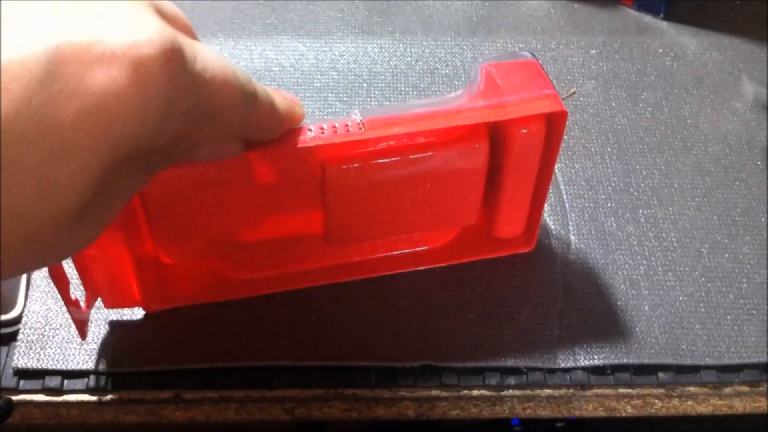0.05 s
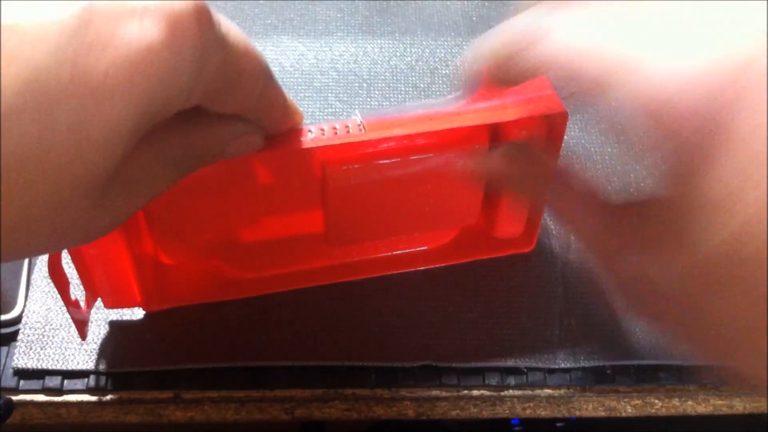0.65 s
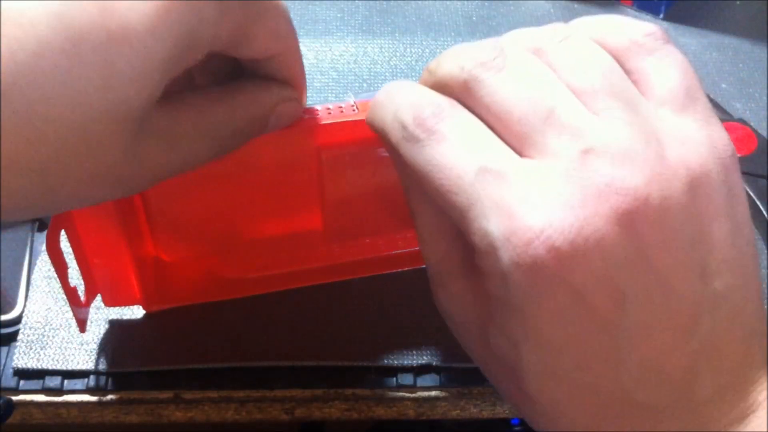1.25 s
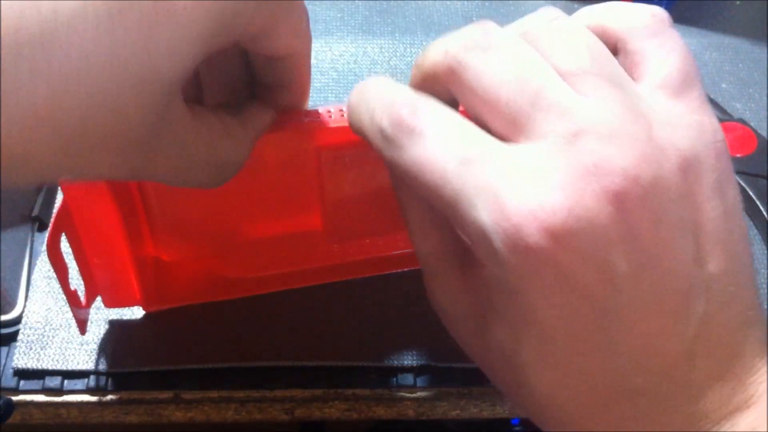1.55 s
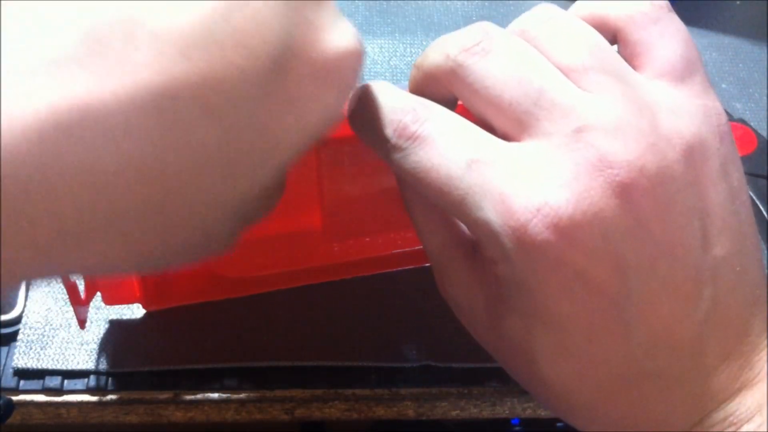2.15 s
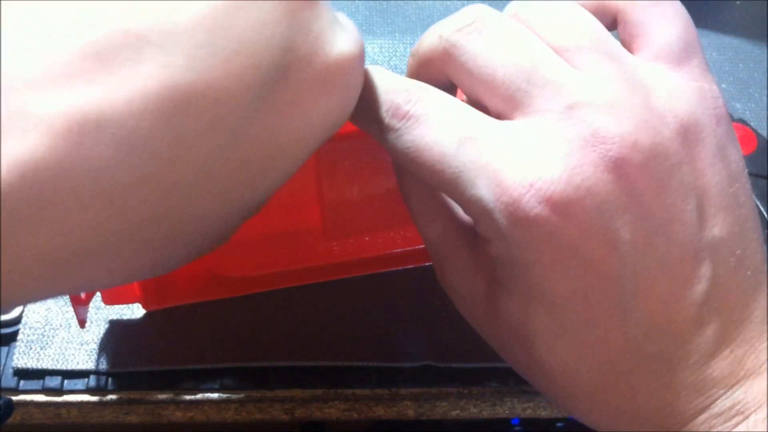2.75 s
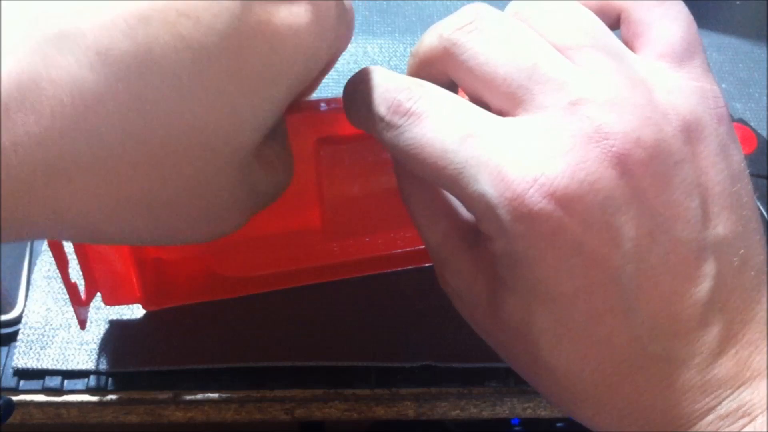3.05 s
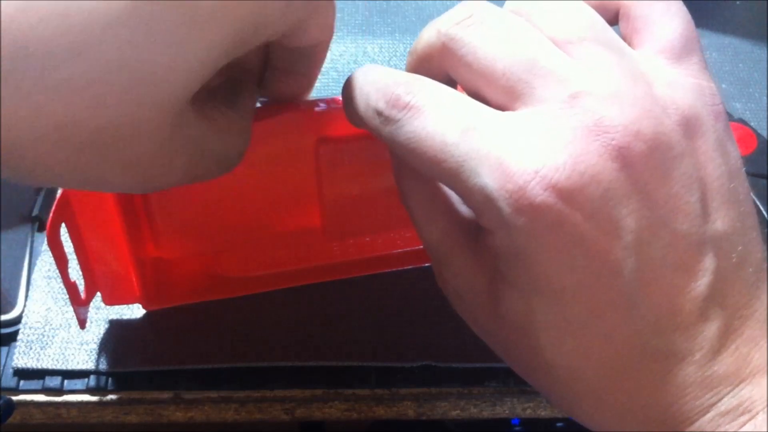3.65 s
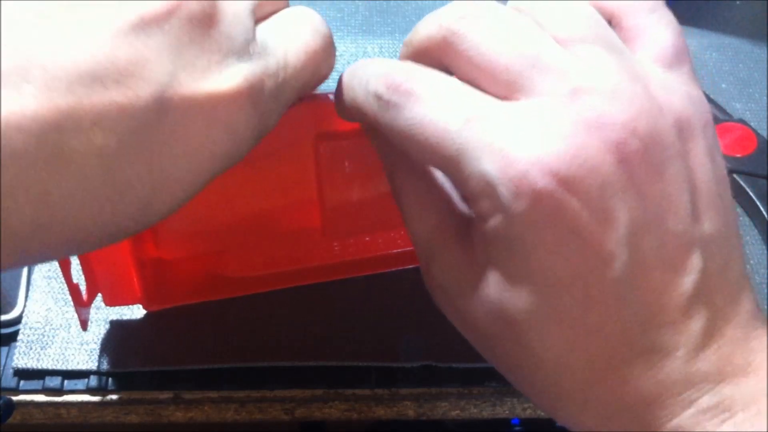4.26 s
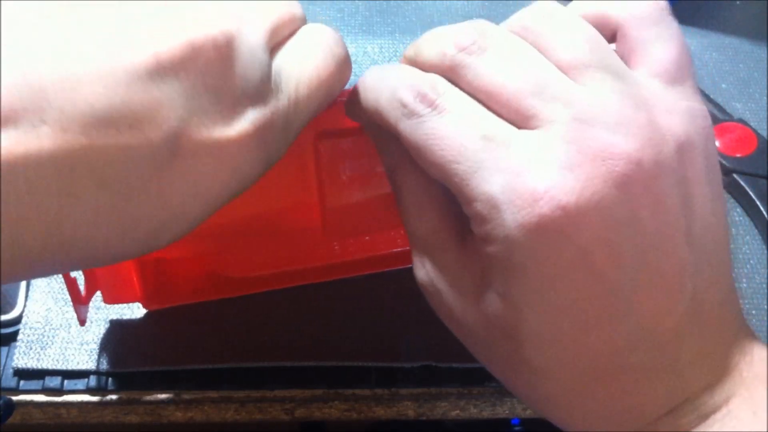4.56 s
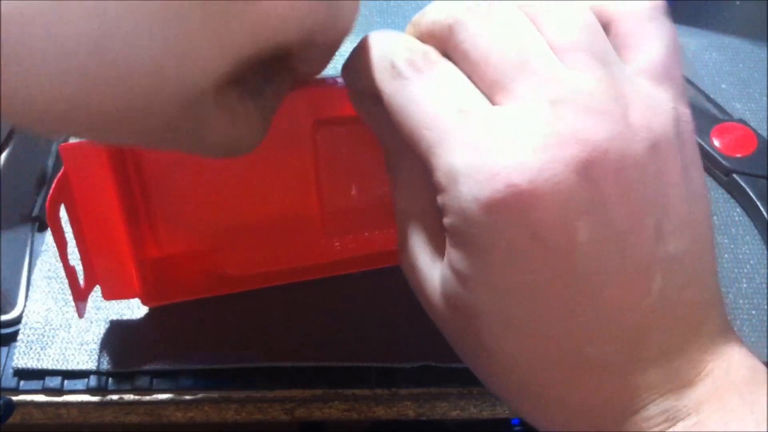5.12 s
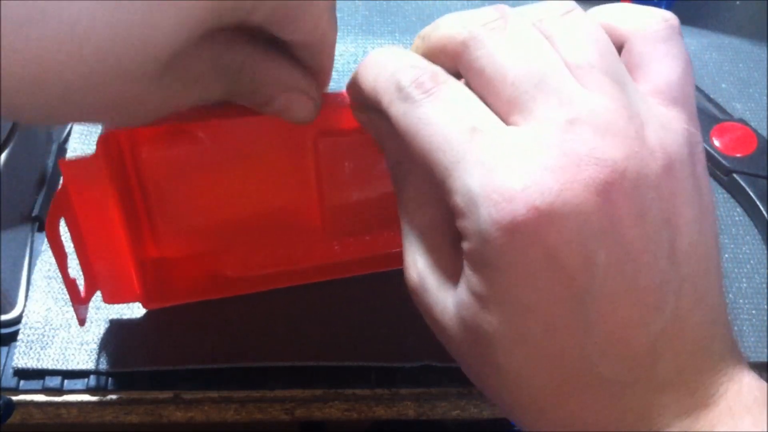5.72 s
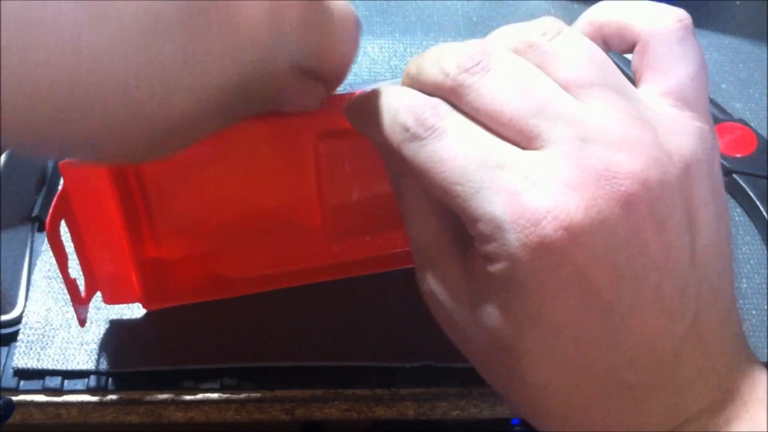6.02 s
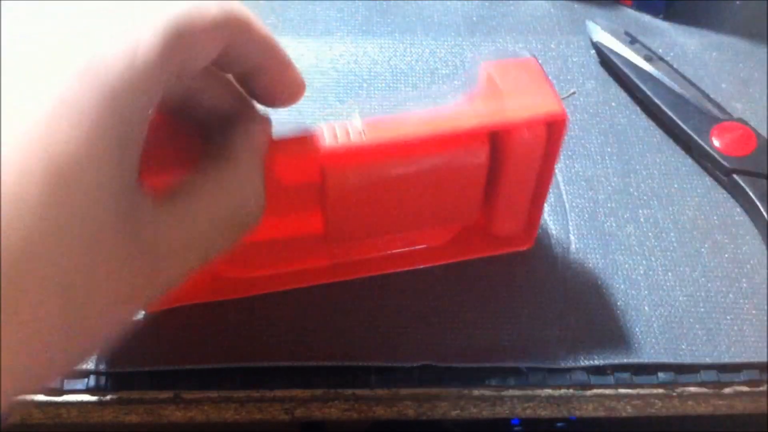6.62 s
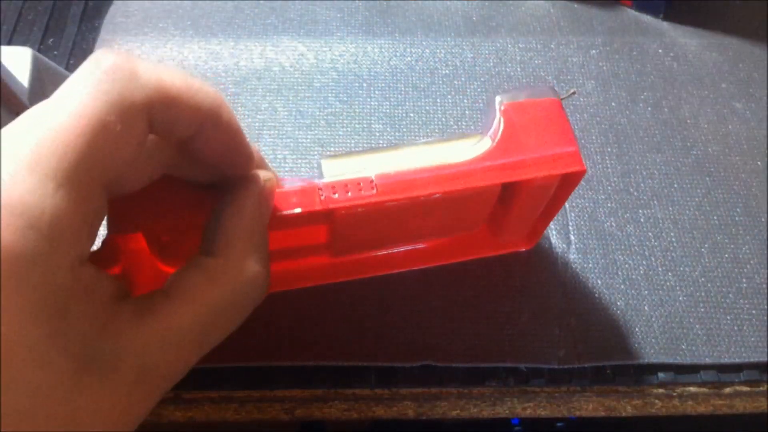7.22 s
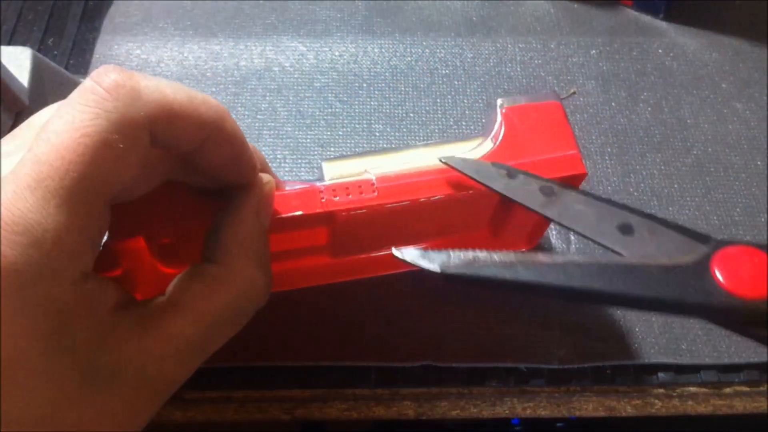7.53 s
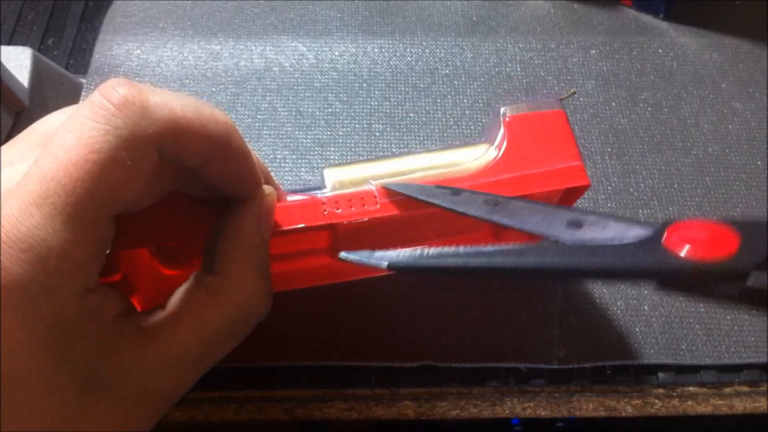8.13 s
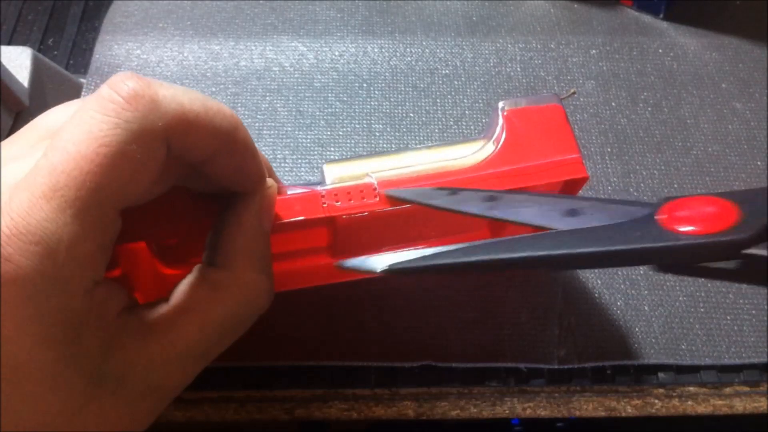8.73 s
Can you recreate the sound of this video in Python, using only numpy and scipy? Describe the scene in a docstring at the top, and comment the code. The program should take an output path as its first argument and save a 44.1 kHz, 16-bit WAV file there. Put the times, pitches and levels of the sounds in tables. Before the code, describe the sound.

In a small room, a fan rushes softly under a thin, very high whistle. Close by, fingers work at stiff plastic packaging on a desk: scattered clicks, a sharp snap, then a thickening run of hollow knocks, crackles and brief squeaks, and another loud snap. After a few nail scrapes, scissors open with a bright steel clink and their blades tick against the plastic several times.

```python
"""A fan and a thin whistle, likely from picture tubes, fill a small room as plastic starts to click.
Two hands pick and prise at a hard blister pack on a desk mat. Its shell buckles with clicks and
hollow knocks; its seam sticks and slips in squeaks and a creak, and gives way in two loud snaps.
Then scissors slide open, their steel blades clink, and they tap against the pack."""
import sys
import numpy as np
from scipy import signal
from scipy.fft import rfft, irfft, next_fast_len
from scipy.io import wavfile

SR = 44100
rng = np.random.default_rng(int(sys.argv[2]) if len(sys.argv) > 2 else 0)


def to_wav(s):
    """Save 16-bit WAV."""
    ch = np.atleast_2d(s).T  # columns
    pcm = np.round(np.clip(ch, -1, 1) * 32767)  # PCM
    wavfile.write(sys.argv[1], SR, pcm.astype(np.int16))


N = 396018
TIME = np.arange(N) / SR
RING = np.arange(SR // 4) / SR  # seconds since a blow


def undb(db):
    """Turn decibels (dB) into a number to multiply by."""
    return 10 ** (np.asarray(db) / 20)


def unit(x):
    """Scale a sound to an average (rms) strength of 1."""
    return x / np.sqrt(np.mean(x ** 2))


def strike(x, db):
    """Scale a blow so that its first 10 ms have this level."""
    return x * undb(db) / np.std(x[:SR // 100])


def add(out, s, x):
    """Mix x into out, starting at second s."""
    i = int(s * SR)
    out[i:i + len(x)] += x[:N - i]


def band(x, hz, kind, order=3):
    """Keep only the lows, the highs or a band between."""
    return signal.sosfilt(signal.butter(order, hz, kind, fs=SR, output="sos"), x)


def colour(x, points):
    """Turn each frequency up or down along a curve of (Hz, dB) points."""
    hz, db = np.transpose(points)
    size = next_fast_len(len(x))
    freqs = np.maximum(np.fft.rfftfreq(size, 1 / SR), 1)
    gain = undb(np.interp(np.log(freqs), np.log(hz), db))
    return irfft(rfft(x, size) * gain, size)[:len(x)]


def fade(t, t60):
    """Die away by 60 dB in t60 seconds, the fade time."""
    return np.exp(-np.log(1000) * t / t60)


def swells(rows):
    """A loudness curve with one bell-shaped rise and fall for each row."""
    return sum(undb(db) * np.exp(-.5 * ((TIME - s) / half) ** 2) for s, half, db in rows)


def walk(rate):
    """Drift at random by about 1, with a new target rate times a second."""
    targets = rng.standard_normal(int(N / SR * rate) + 2)
    return np.interp(TIME * rate, np.arange(len(targets)), targets)


def ring(notes, scatter_db, detune):
    """A struck thing rings with its own notes; spot and grip shift their strength and pitch."""
    hz, db, t60 = np.transpose(notes)[:, :, None]
    louder, higher, flip = rng.standard_normal((3, len(notes), 1))
    strength = np.sign(flip) * undb(db + scatter_db * louder) * fade(RING, t60)
    return np.sum(strength * np.sin(2 * np.pi * hz * (1 + detune * higher) * RING), axis=0)


def grains(rate, scatter_db):
    """Tiny slips of uneven size at random moments, about rate a second."""
    slips = (rng.random(N) < rate / SR) * rng.choice([-1, 1], N)
    return unit(slips * undb(scatter_db * rng.standard_normal(N)))


# The rush of the fan, with microphone hiss. Each row: frequency in Hz, boost or cut in dB.
AIR_COLOUR = [(25, -43), (85, -26), (161, -4.5), (247, -6.5), (368, -2), (480, -8.5), (520, -4.5),
              (840, -7), (1970, -14), (4300, -25.5), (11500, -29), (14500, -32.5)]
# The hum of the fan blades. Each row: pitch in Hz, level in dB.
FAN_TONES = [(817, -68), (875, -64)]
def fan(air_db=-53, waver=0.00374):
    """A fan makes a steady rush of air and two wavering blade tones."""
    air = unit(colour(rng.standard_normal(N), AIR_COLOUR)) * undb(air_db + .5 * walk(rate=3.3))
    tones = 0
    for hz, db in FAN_TONES:
        gain = undb(db + walk(rate=2.5))
        phase = 2 * np.pi * hz * np.cumsum(1 + waver * walk(rate=26)) / SR
        tones += gain * unit(np.sin(phase))
    return air + tones


# The whistle swells and fades as arms move through its standing waves.
# Each row: time in seconds, level in dB before lift_db is added.
WHISTLE_LEVELS = [(0.0, -48), (0.45, -58), (0.9, -48), (1.6, -57), (3.6, -48), (4.35, -60), (4.5, -52),
                  (5.1, -56), (5.4, -70), (6.3, -51), (7.35, -54), (8.25, -65), (8.98, -48)]
def whistle(line_hz=(15734.3, 15747.3), second_db=-5, lift_db=2):
    """Two very high tones, likely from picture tubes, lie so close that they throb."""
    s, db = np.transpose(WHISTLE_LEVELS)
    first, second = (np.sin(2 * np.pi * hz * TIME) for hz in line_hz)
    return unit(first + undb(second_db) * second) * undb(np.interp(TIME, s, db) + lift_db)


# The plastic shell's own notes. Each row: pitch in Hz, strength in dB, fade time in seconds.
SHELL_NOTES = [(280, -10.5, 0.0454), (382, -6.5, 0.0683), (531.1, -4.5, 0.06), (875, -9.5, 0.037),
               (950, 0, 0.025), (1151, 7, 0.02), (1410.7, 7.5, 0.03), (1626, 3.5, 0.022), (1927, 3, 0.021),
               (2240, -9, 0.037)]
# The tone of a cracking crease. Each row: frequency in Hz, boost or cut in dB.
CRACK_COLOUR = [(1500, 1), (2800, 2.5), (4000, -1), (5400, 3.5), (6900, 1), (9000, 1), (11500, 2.5),
                (15500, -7.5)]
def buckle(flex_db, panel_db, crack_db, length_s, crack_t60=0.01994, sizzle_db=-22, sizzle_t60=0.37):
    """The plastic bends, then jumps: its panels ring and a crease cracks."""
    hz, db = np.transpose(CRACK_COLOUR)
    db_per_octave = 0.93 * min(crack_db - panel_db, 0)  # a soft blow has a dull crack
    crease_db = 5 * rng.uniform(-1.2, 1, len(hz))  # no two creases sound alike
    curve = np.c_[hz, db + crease_db + db_per_octave * np.log2(hz / hz[0])]
    noise = colour(rng.standard_normal(len(RING)), curve)
    after = np.maximum(RING - length_s / 2, 0)
    swell = np.minimum(RING / (length_s / 2 + 1 / SR), 1)
    # the thin sheet's countless high notes sizzle on after the crack
    crack = noise * swell * (fade(after, crack_t60) + undb(sizzle_db) * fade(after, sizzle_t60))
    # the panel gives a little first, then jumps
    body = 0.57 * ring(SHELL_NOTES, scatter_db=0.5, detune=0.044) + undb(2) * crack
    jump = int(length_s / 2 * SR)
    body[jump:] += ring(SHELL_NOTES, scatter_db=3, detune=0.0282)[:len(RING) - jump]
    lows = strike(band(body, [150, 720], "band", order=2), flex_db)
    mids = strike(band(body, [760, 2250], "band"), panel_db - 0.5)
    highs = strike(band(crack, 2300, "high", order=2), crack_db)
    return lows + mids + highs


def click(panel_db, sharp_db, length_s):
    """One click of the shell: the sharper it is, the less the broad panels flex."""
    flex_db = panel_db - 14 - 0.5 * sharp_db
    return buckle(flex_db, panel_db, panel_db + sharp_db, length_s)


# Finger clicks. Each row: start in seconds, rough panel level in dB, sharpness in dB
# (added to the panel level to give the crack's level).
CLICKS = [(0.078, -43, -6), (0.2667, -40.5, -12.5), (0.2715, -28.5, -3), (0.491, -47.5, -3.5),
          (0.53, -44, -3.5), (0.756, -54.5, 0), (0.98, -34, -7), (1.5487, -50.5, 13.5), (1.6441, -38, -1.5),
          (1.716, -39, 6), (1.9526, -35.5, -6.5), (2.262, -54, 1), (2.443, -56.5, 3), (2.5582, -57, 3.5),
          (2.9844, -51.5, -2), (3.394, -56, 6.5), (4.2822, -33, 0), (4.3076, -34, -3.5),
          (4.4373, -35, -3.5), (4.6224, -31, -3.5), (4.87, -35, -3.5), (5.0276, -34.5, -9),
          (5.088, -31, -5.5), (5.1577, -34.5, -6), (5.1768, -35, -6), (5.2286, -39, -7.5), (5.245, -36, -8),
          (5.3146, -38.5, -1), (5.44, -40, 0), (5.473, -37, -4), (5.494, -42.5, -3.5), (5.7, -45.5, -8.5),
          (5.7997, -47, -9), (5.855, -45, -9), (5.891, -43.5, -7), (5.9283, -35, -6), (5.933, -37.5, -2),
          (6.3114, -27, -9), (6.6187, -41.5, -3.5), (6.713, -35.5, -2.5)]
def clicks(usual_s=0.00186, usual_crack_db=-42, halving_db=13.5):
    """Fingers buckle the shell; the harder a crease cracks, the quicker it gives."""
    out = np.zeros(N)
    for s, panel_db, sharp_db in CLICKS:
        length_s = usual_s * 2 ** ((usual_crack_db - panel_db - sharp_db) / halving_db)
        add(out, s, click(panel_db, sharp_db, length_s))
    return out


# Soft bumps on the desk. Each row: start in seconds, level in dB.
BUMPS = [(0.286, -57), (.517, -52.5), (6.742, -56)]
# The desk's own notes. Each row: pitch in Hz, strength in dB, fade time in seconds.
DESK_NOTES = [(118, 0, 0.17), (194.3, 3.5, 0.13)]
def bumps(rise_s=0.007):
    """The mat cushions each bump, so only the desk's low notes swell up."""
    out = np.zeros(N)
    for s, db in BUMPS:
        desk = ring(DESK_NOTES, scatter_db=1, detune=.02)
        add(out, s, undb(db) * unit(desk * (1 - np.exp(-RING / rise_s))))
    return out


# Light brushes. Each row: middle in seconds, half length in seconds, level in dB.
BRUSHES = [(0.5, 0.064, -54), (1.25, 0.0072, -47.5), (6.553, 0.041, -47)]
# Their tone. Each row: frequency in Hz, boost or cut in dB.
BRUSH_COLOUR = [(400, -8), (1400, 12), (2500, 4), (11000, 1), (15000, -11.5)]
def brushes():
    """Skin brushes past plastic in short swells of fine, bright grains."""
    return swells(BRUSHES) * unit(colour(grains(rate=6200, scatter_db=8), BRUSH_COLOUR))


# The two loud snaps. Each row: start in seconds, rough panel level in dB, sharpness in dB,
# flap level in dB, the flap's first pitch in Hz.
SNAPS = [(1.4284, -26.5, -5, -19, 1470), (5.3349, -22, 2.5, -27.5, 2000)]
# The parting seam's notes. Each row: pitch in Hz, strength in dB, fade time in seconds.
SEAM_NOTES = [(1987, 3.5, 0.02), (6800, 1.5, .014), (11484, 4, 0.0073)]
def snaps(rest_hz=1260, sag_s=0.00418, rise_s=0.00109, flap_t60=0.017, flutter=0.13):
    """The seam cracks open and rings; the freed flap flutters, and its pitch sags as it relaxes."""
    out = np.zeros(N)
    for s, panel_db, sharp_db, flap_db, start_hz in SNAPS:
        hz = rest_hz + (start_hz - rest_hz) * np.exp(-RING / sag_s)
        hz *= 1 + flutter * walk(rate=600)[:len(RING)]
        swing = (1 - np.exp(-(RING / rise_s) ** 2)) * fade(RING, flap_t60)
        flap = swing * np.sin(2 * np.pi * np.cumsum(hz) / SR)
        seam = ring(SEAM_NOTES, scatter_db=1, detune=.01)
        crack_db = panel_db + sharp_db
        shell = buckle(panel_db - 8, panel_db, crack_db, length_s=0.00099)
        add(out, s, shell + strike(seam, crack_db - 1) + strike(flap, flap_db))
    return out


# How hard the fingers drag. Each row: time in seconds, level in dB.
DRAG_LEVELS = [(2.6, -63.5), (3.0, -51), (3.3, -50.5), (3.7, -56.5), (4.26, -56.5), (4.4, -46), (4.72, -56),
               (5.05, -52), (5.5, -50), (5.6, -71), (6.1, -78.5)]
# The tone of the drag. Each row: frequency in Hz, boost or cut in dB.
DRAG_COLOUR = [(80, -10), (260, 4.5), (540, -4), (850, -3), (1400, -5), (1900, -12), (2600, 2.5),
               (12000, -3)]
def drag(fingers=4, grit_db=-3):
    """Dragging fingers catch and let go, and each tiny slip shakes the shell."""
    s, db = np.transpose(DRAG_LEVELS)
    body = 0
    for _ in range(fingers):
        spot = ring(SHELL_NOTES, scatter_db=0, detune=0.067)
        grit = undb(grit_db) * rng.standard_normal(len(RING)) * fade(RING, 0.0037)
        slips = grains(rate=65, scatter_db=4.5)
        body += signal.fftconvolve(slips, spot + grit)[:N]
    return unit(colour(body, DRAG_COLOUR)) * undb(np.interp(TIME, s, db, left=-120, right=-120))


# Hollow knocks. Each row: start in seconds, panel level in dB before filtering,
# boom in dB compared with the panel.
KNOCKS = [(3.108, -46, -3), (3.338, -43, -2.5), (3.38, -38.5, -3.5), (3.5, -50, 4), (3.546, -48, 2),
          (4.373, -40, -4), (4.399, -33.5, -4.5), (4.4344, -32.5, -5.5), (4.4722, -40.5, -2),
          (4.5369, -27.5, -14), (4.6676, -28.5, -10.5), (4.7907, -31, -5.5), (4.955, -40, -14)]
# How a push in mid-panel favours the shell's notes. Each row: frequency in Hz, boost or cut in dB.
KNOCK_COLOUR = [(385, 2.5), (540, -17.5), (850, 18.5), (1200, 5)]
def knocks(contact_db=-3, contact_t60=0.0098):
    """A broad panel pops in under a fingertip, and the hollow of the pack booms."""
    out = np.zeros(N)
    hz, db, t60 = np.transpose(SHELL_NOTES)
    notes = np.c_[hz, db + np.interp(hz, *np.transpose(KNOCK_COLOUR)), t60]
    deep = hz < 700
    for s, panel_db, boom_db in KNOCKS:
        push = rng.standard_normal(len(RING)) * fade(RING, contact_t60)
        contact = strike(band(push, [900, 2000], "band", order=1), contact_db)
        panel, boom = (ring(part, scatter_db=3, detune=0.0406) for part in (notes[~deep], notes[deep]))
        add(out, s, strike(panel + contact, panel_db) + strike(boom, panel_db + boom_db))
    thin = band(out, 250, "high")  # so light a shell gives no bass
    return band(thin, 3800, "low", order=1)


# Two squeaks, one list each. Each row: time in seconds, slips per second, level in dB.
SQUEAKS = [
    [(3.186, 1900, -55), (3.196, 1700, -50), (3.228, 2000, -56)],
    [(5.02, 1120, -60), (5.03, 1130, -35.5), (5.06, 1140, -34), (5.097, 1200, -35.5), (5.118, 1050, -56)],
]
def squeak(curve, jitter=0.0953, overtone_db=-20):
    """The seam sticks and slips so fast that it sings at a note of the panel."""
    s, hz, db = np.transpose(curve)
    phase = 2 * np.pi * np.cumsum(np.interp(TIME, s, hz) * (1 + jitter * walk(rate=1100))) / SR
    tone = np.sin(phase) + undb(overtone_db) * np.sin(2 * phase)
    tone *= undb(3 * walk(rate=300))
    return unit(tone) * undb(np.interp(TIME, s, db, left=-120, right=-120))


# The course of the creak. Each row: time in seconds, slips per second, level in dB.
CREAK = [(3.981, 334, -46), (3.988, 377, -36), (4.04, 380, -47), (4.098, 380, -40), (4.11, 375, -64)]
# Its tone. Each row: frequency in Hz, boost or cut in dB.
CREAK_COLOUR = [(100, -34), (280, 14), (380, 0.5), (700, -3), (1080, 4.5), (1370, -4), (1900, -4),
                (3200, 3), (4000, -16)]
def creak(jitter=.06, scatter_db=4.5, rasp_db=-4):
    """Slower, uneven slips of the seam drum on the shell, and each one rasps."""
    s, hz, db = np.transpose(CREAK)
    cycles = np.cumsum(np.interp(TIME, s, hz) * (1 + jitter * walk(rate=290))) / SR
    slips = np.diff(np.floor(cycles), prepend=0) * undb(scatter_db * rng.standard_normal(N))
    body = signal.fftconvolve(slips, ring(SHELL_NOTES, scatter_db=1, detune=.01))[:N]
    rasp = rng.standard_normal(N) * (1 - cycles % 1) ** 2
    sound = unit(body) + undb(rasp_db) * unit(band(rasp, 5200, "low"))
    return unit(colour(sound, CREAK_COLOUR)) * undb(np.interp(TIME, s, db, left=-120, right=-120))


# Nail scrapes. Each row: middle in seconds, half length in seconds, level in dB.
SCRAPES = [(4.622, 0.015, -44), (5.083, 0.0063, -34.5)]
# The notes of nail and rim. Each row: pitch in Hz, strength in dB, fade time in seconds.
NAIL_NOTES = [(530, -7, 0.039), (1430, -0.5, 0.03), (3740, -2.5, 0.013), (4170, -10, 0.019),
              (5500, -11, 0.012)]
def scrapes(catch_hz=450, jitter=.15, rasp_db=-4):
    """A nail catches hundreds of times a second; each catch rasps and rings the pack's rim."""
    cycles = np.cumsum(catch_hz * (1 + jitter * walk(rate=catch_hz))) / SR
    catches = np.diff(np.floor(cycles), prepend=0)
    rim = signal.fftconvolve(catches, ring(NAIL_NOTES, scatter_db=1, detune=.02))[:N]
    rasp = band(rng.standard_normal(N) * (1 - cycles % 1) ** 2, [4800, 6600], "band", order=1)
    return swells(SCRAPES) * unit(unit(rim - rim.mean()) + undb(rasp_db) * unit(rasp))


# Three quick skips of a nail. Each row: start in seconds, level in dB.
NAIL_SKIPS = [(6.363, -39), (6.3717, -41), (6.381, -39)]
def nail_skips(rasp_db=-7, rasp_t60=0.069):
    """A nail skips along the rim, and each catch is a short, rasping chirp."""
    out = np.zeros(N)
    for s, db in NAIL_SKIPS:
        rasp = band(rng.standard_normal(len(RING)), [400, 4500], "band", order=1) * fade(RING, rasp_t60)
        rim = ring(NAIL_NOTES, scatter_db=3, detune=0.011)
        add(out, s, strike(rim + undb(rasp_db) * rasp, db))
    return out


# The scissors open. Each row: middle in seconds, half length in seconds, level in dB.
SLIDES = [(6.963, 0.025, -55.5), (7.342, 0.017, -47), (7.403, 0.0121, -53)]
# The low and high edges of their hiss, in Hz.
HISS_HZ = [7100, 13500]
def blade_slides():
    """Steel slides on steel with a thin, high hiss."""
    return swells(SLIDES) * unit(band(rng.standard_normal(N), HISS_HZ, "band", order=1))


# The scissors clink as they are picked up. Each row: start in seconds, ring in dB, tick in dB.
CLINKS = [(6.9929, -44.5, -41.5), (6.9963, -31, -33.5), (7.341, -47, -47)]
# The blades' notes, damped by the hand. Each row: pitch in Hz, strength in dB, fade time in seconds.
STEEL_NOTES = [(2190, -11, 0.051), (3520, -5, 0.0245), (4330, -8, 0.027), (5227, -14, 0.055),
               (7240, 15.5, 0.0068)]
def blade_clinks(touch_s=0.000255, tick_t60=0.017, shimmer_db=-19, shimmer_t60=0.306):
    """The blades meet with a bright tick, then shimmer and ring, slightly apart in pitch."""
    out = np.zeros(N)
    rise = 1 - np.exp(-RING / touch_s)
    for s, ring_db, tick_db in CLINKS:
        steel = sum(ring(STEEL_NOTES, scatter_db=1, detune=.02) for blade in range(2))
        noise = band(colour(rng.standard_normal(len(RING)), CRACK_COLOUR), [2000, 9000], "band", order=1)
        tick = noise * (fade(RING, tick_t60) + undb(shimmer_db) * fade(RING, shimmer_t60))
        add(out, s, strike(steel * rise, ring_db) + strike(tick * rise, tick_db))
    return out


# Blade taps. Each row: start in seconds, ring level in dB, pitch of the touched wall in Hz.
TAPS = [(7.7233, -45, 1620), (7.886, -46.5, 1230), (8.0063, -47.5, 1520), (8.3451, -41, 1520),
        (8.482, -41.5, 1167), (8.9007, -49, 1310)]
# That wall's notes. Each row: multiple of its pitch, strength in dB, fade time in seconds.
WALL_NOTES = [(1, 3, 0.026), (2.2, -2.5, 0.019)]
def blade_taps(skid_s=.013, softer_db=4.5, touch_s=0.00395, catches=3):
    """A blade ticks on a wall of the pack, which rings; it skids and catches again, softer each time."""
    out = np.zeros(N)
    for s, db, hz in TAPS:
        wall = ring(np.array(WALL_NOTES) * [hz, 1, 1], scatter_db=1, detune=.01)
        add(out, s, strike(wall * (1 - np.exp(-RING / touch_s)), db))
        for k, early in enumerate(rng.random(catches)):
            tick = click(db - 0.5 - softer_db * k, sharp_db=-4.5, length_s=touch_s)
            add(out, s + skid_s * k * (1 - early / 4), tick)
    return out


# The tone of the room's echo. Each row: frequency in Hz, boost or cut in dB.
ECHO_COLOUR = [(150, 2.5), (1400, -0.5), (7000, -1.5), (15000, -10)]
def room(x, near_db=-19, near_t60=0.059, far_db=-15, far_t60=0.332, treble_t60=0.14):
    """Sound bounces off desk and hands, then off the walls, whose echo loses its treble first."""
    t = TIME[:SR // 2]
    near, far = (colour(rng.standard_normal(len(t)), ECHO_COLOUR) for _ in range(2))
    near = near * fade(t, near_t60) * (t > .003)
    dull = band(far, 4000, "low", order=1)
    far = (dull * fade(t, far_t60) + (far - dull) * fade(t, treble_t60)) * (t > .0072)
    echo = (undb(near_db) * unit(near) + undb(far_db) * unit(far)) / np.sqrt(len(t))
    return x + signal.fftconvolve(x, echo)[:N]


def scene():
    """Pack, scissors and desk sound in the room, over the fan and the whistle."""
    plastic = clicks() + brushes() + snaps() + drag() + knocks()
    plastic += sum(map(squeak, SQUEAKS)) + creak() + scrapes() + nail_skips()
    scissors = blade_slides() + blade_clinks() + blade_taps()
    return (room(plastic + scissors + bumps()) + fan() + whistle())[None]


def record(dry, top_hz=16200):
    """The microphone clips anything too loud and cuts the highest treble."""
    treble_cut = signal.ellip(10, .1, 80, top_hz, fs=SR, output="sos")
    return signal.sosfilt(treble_cut, np.clip(dry, -1, 1))


dry = scene()
out = record(dry)
to_wav(out)
```